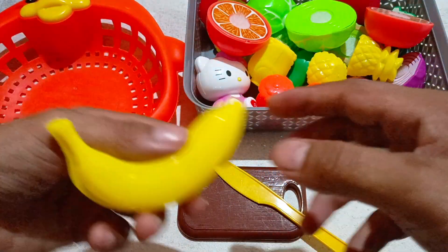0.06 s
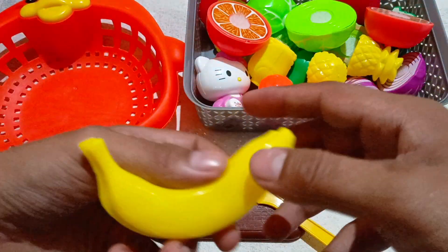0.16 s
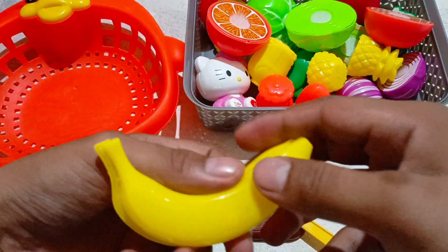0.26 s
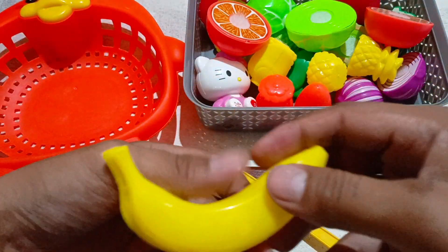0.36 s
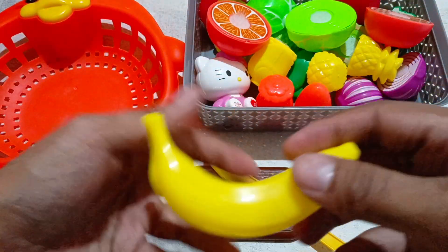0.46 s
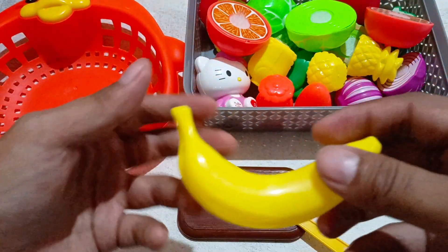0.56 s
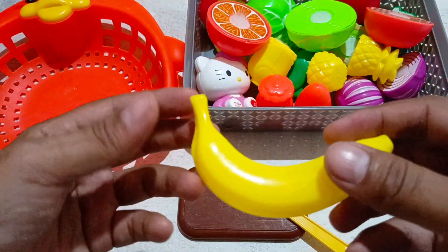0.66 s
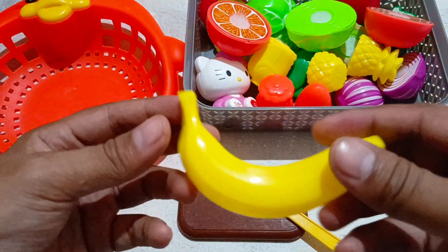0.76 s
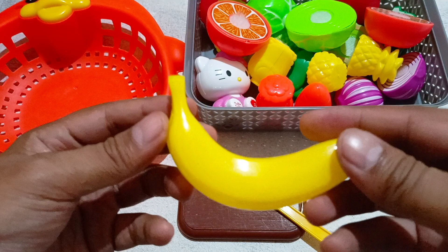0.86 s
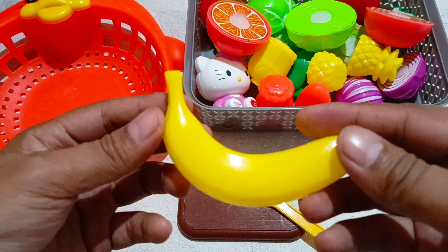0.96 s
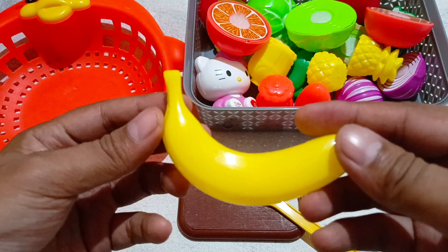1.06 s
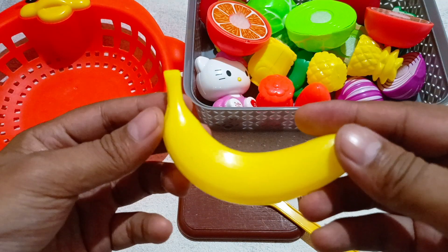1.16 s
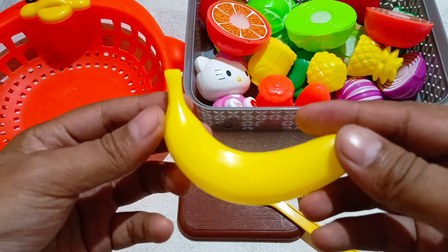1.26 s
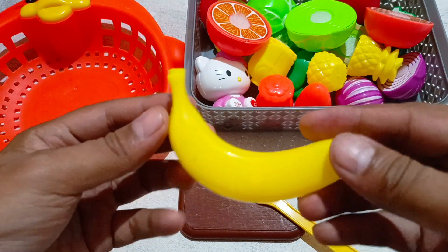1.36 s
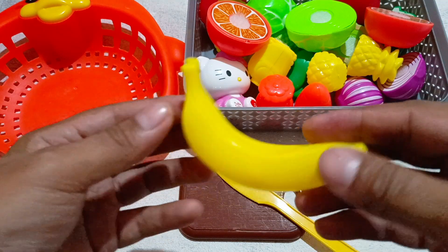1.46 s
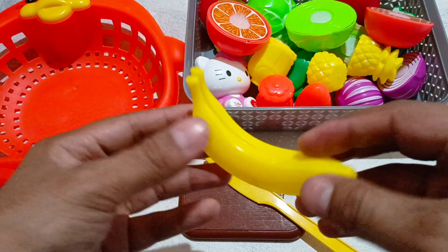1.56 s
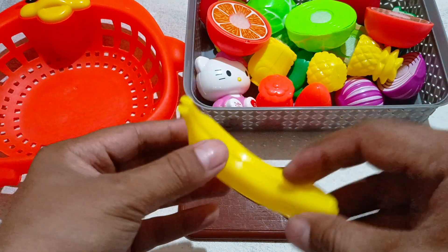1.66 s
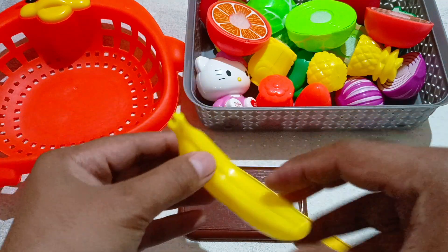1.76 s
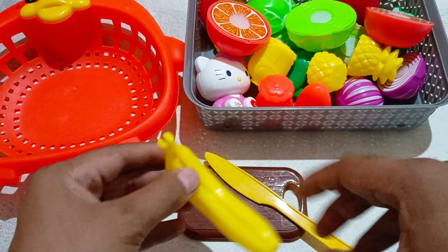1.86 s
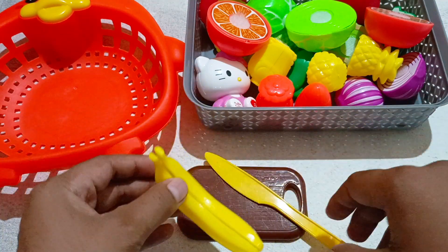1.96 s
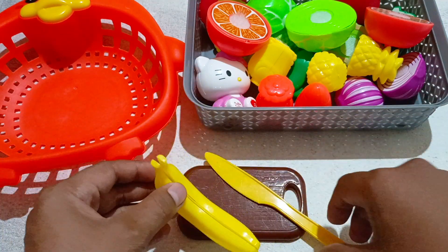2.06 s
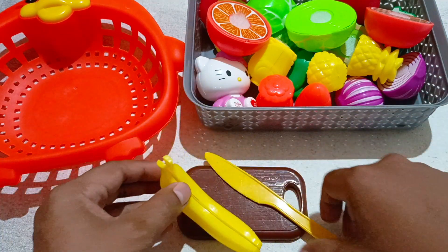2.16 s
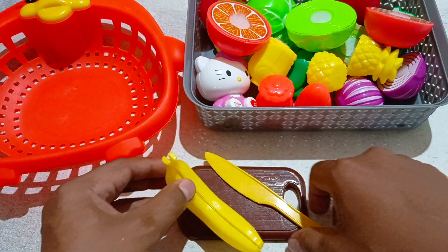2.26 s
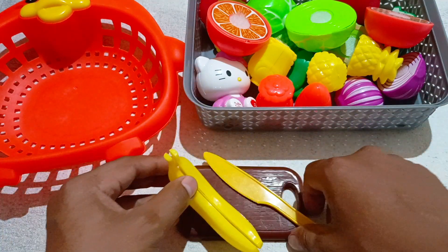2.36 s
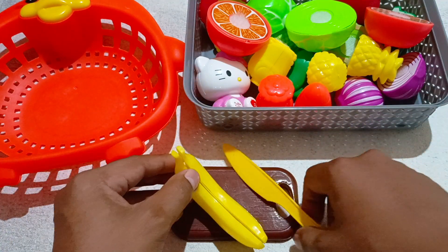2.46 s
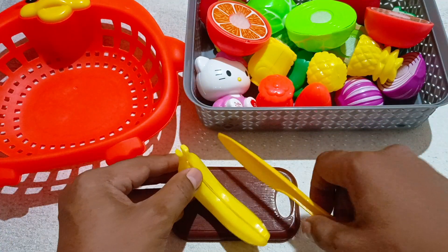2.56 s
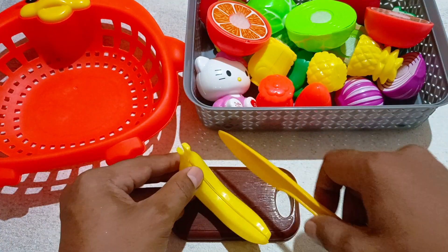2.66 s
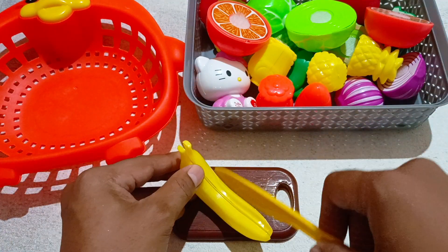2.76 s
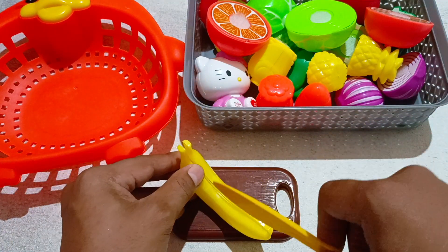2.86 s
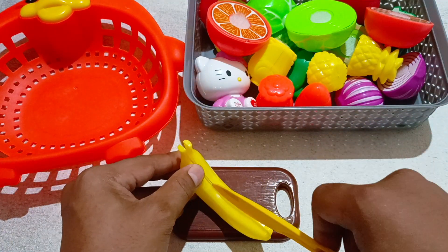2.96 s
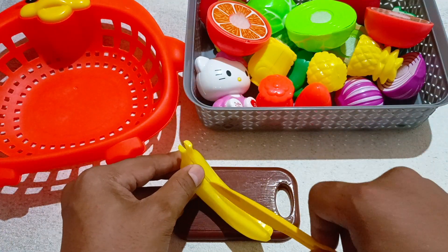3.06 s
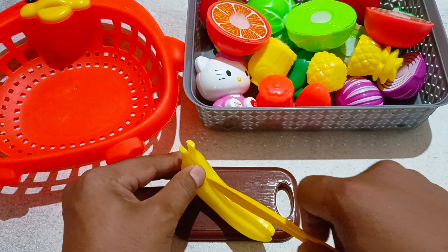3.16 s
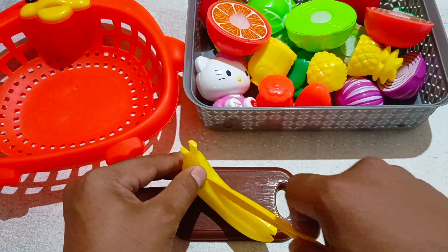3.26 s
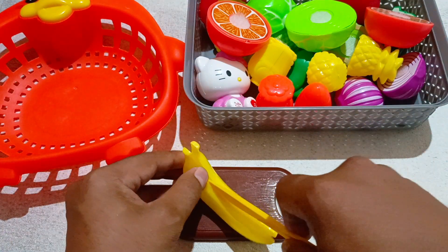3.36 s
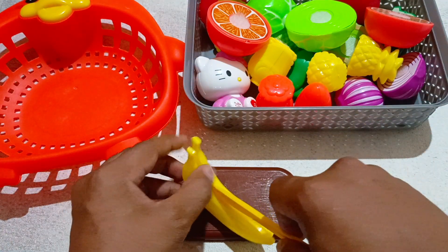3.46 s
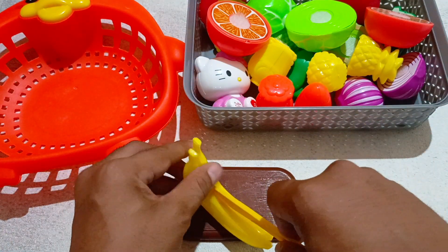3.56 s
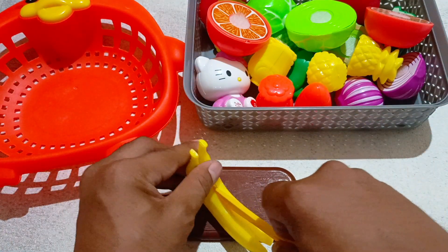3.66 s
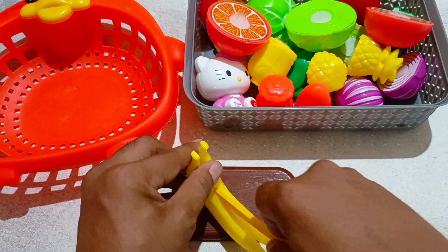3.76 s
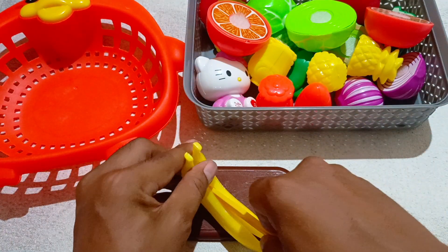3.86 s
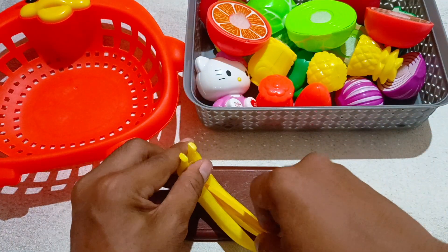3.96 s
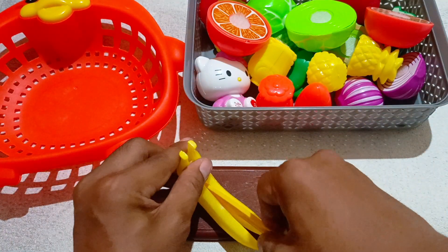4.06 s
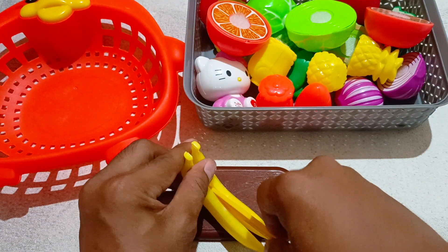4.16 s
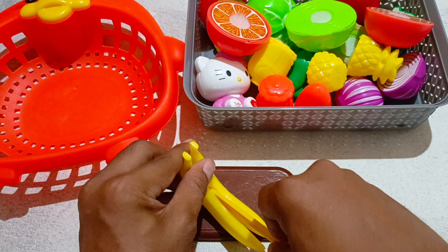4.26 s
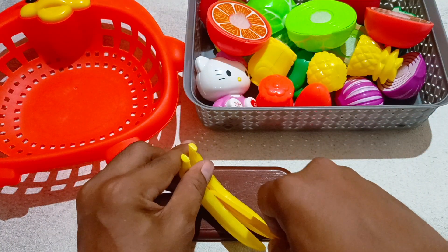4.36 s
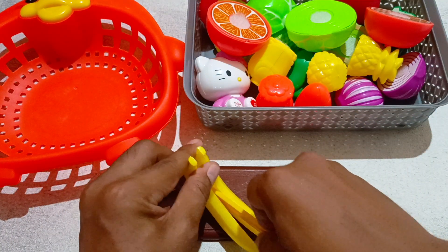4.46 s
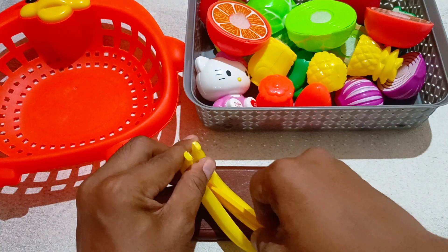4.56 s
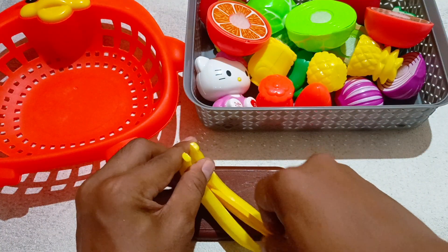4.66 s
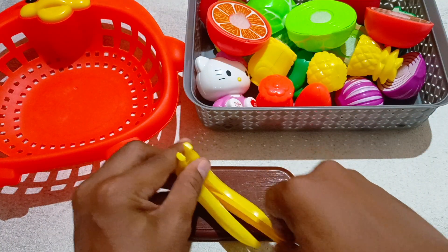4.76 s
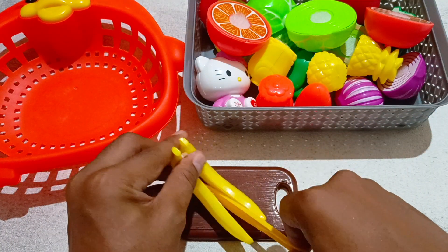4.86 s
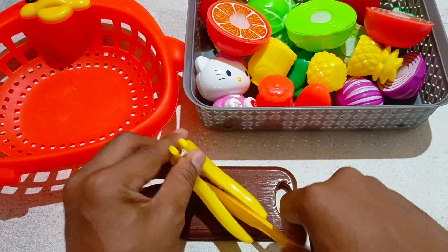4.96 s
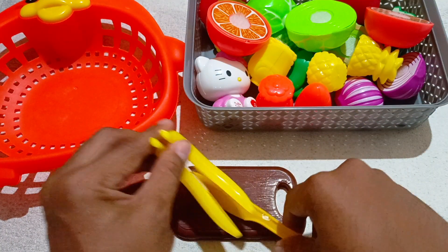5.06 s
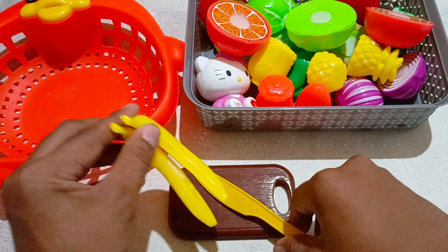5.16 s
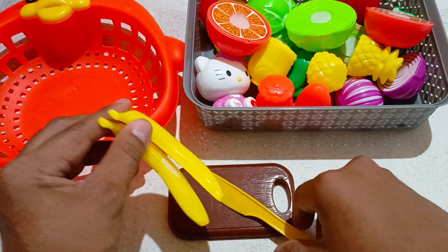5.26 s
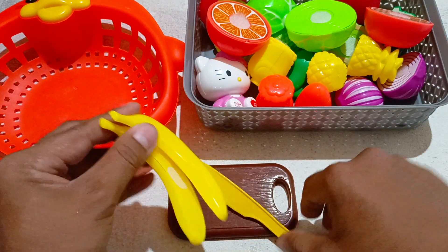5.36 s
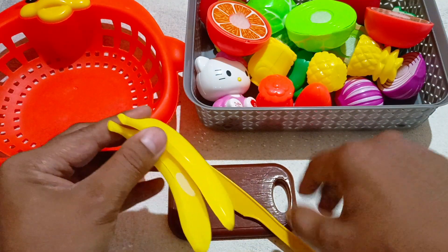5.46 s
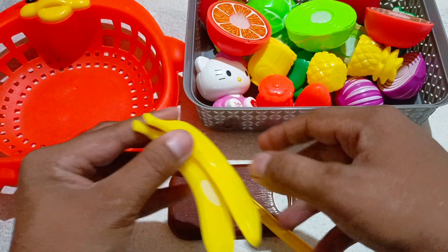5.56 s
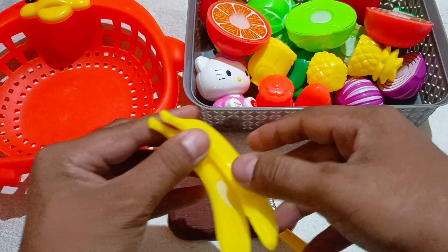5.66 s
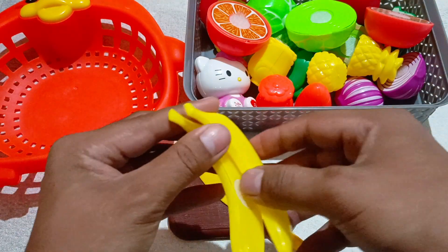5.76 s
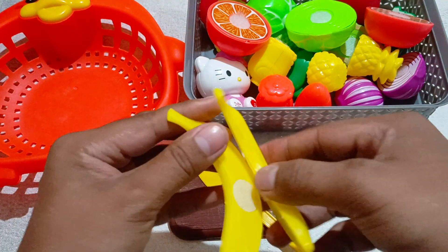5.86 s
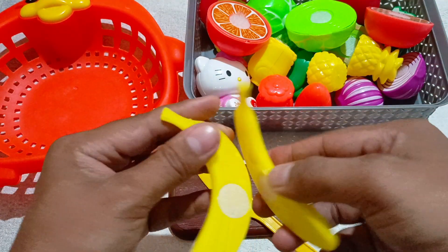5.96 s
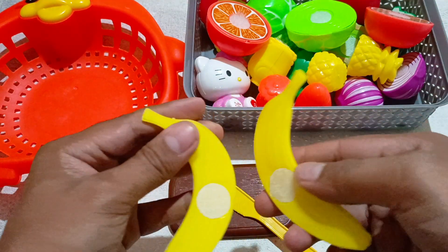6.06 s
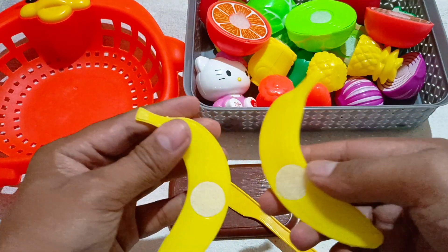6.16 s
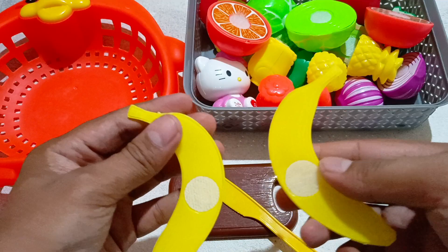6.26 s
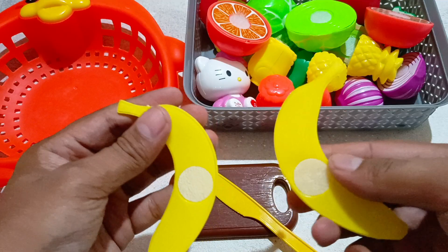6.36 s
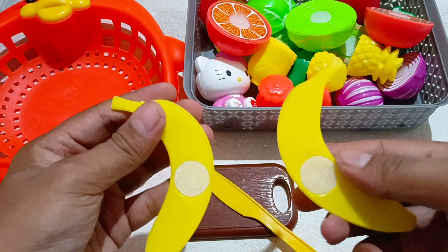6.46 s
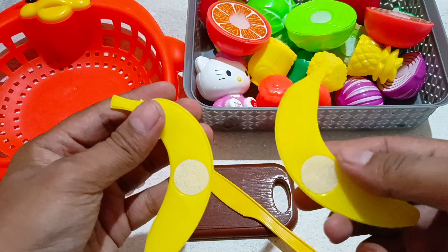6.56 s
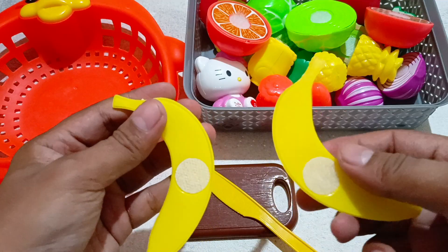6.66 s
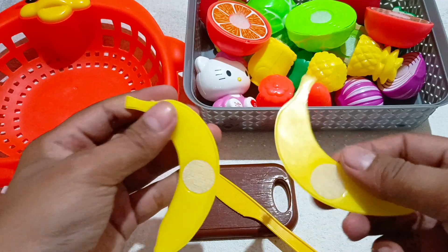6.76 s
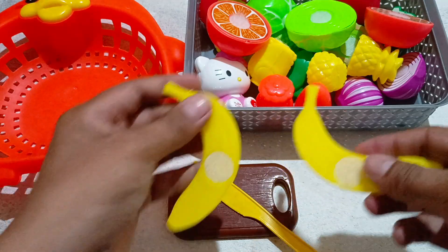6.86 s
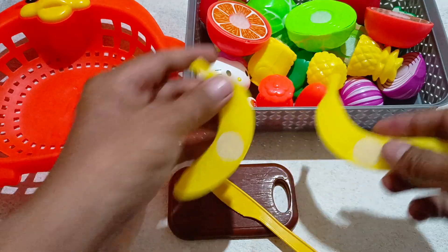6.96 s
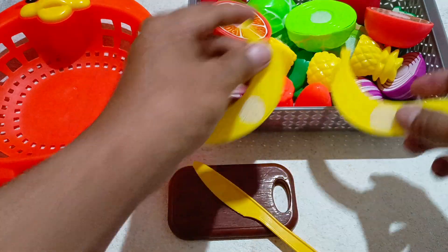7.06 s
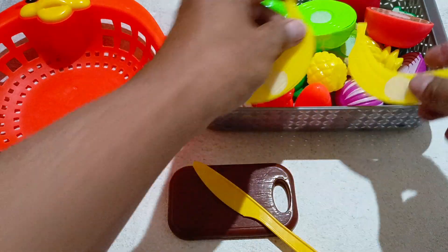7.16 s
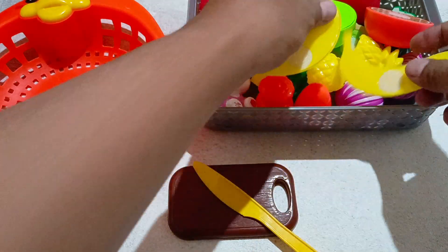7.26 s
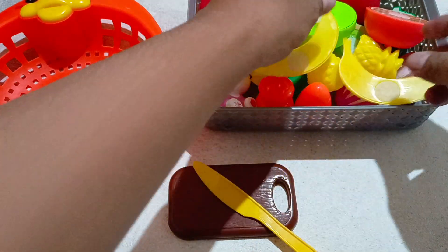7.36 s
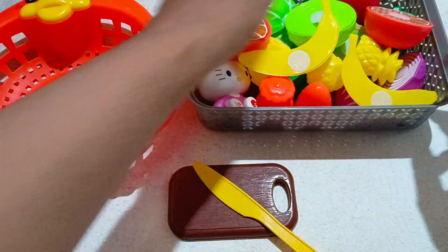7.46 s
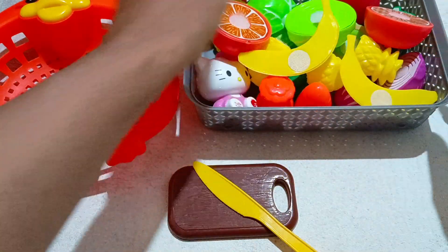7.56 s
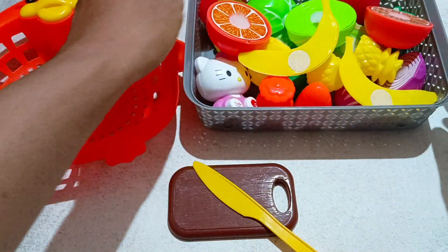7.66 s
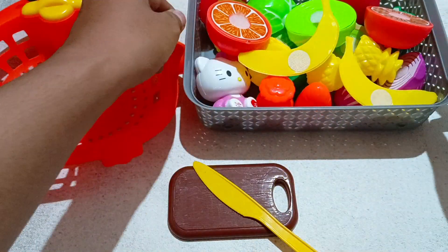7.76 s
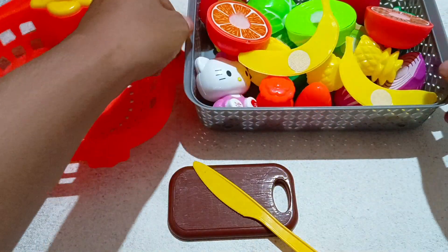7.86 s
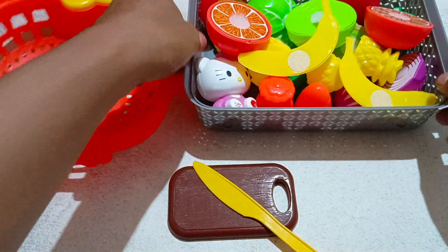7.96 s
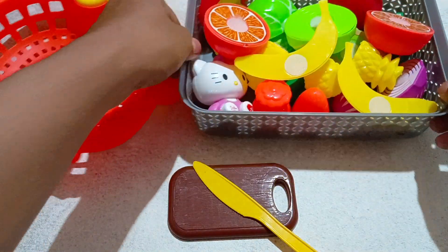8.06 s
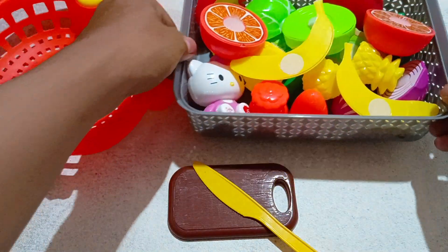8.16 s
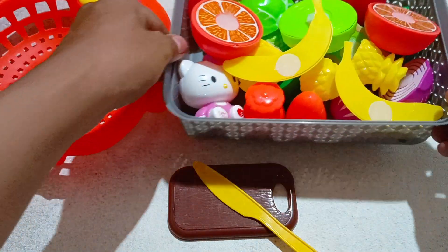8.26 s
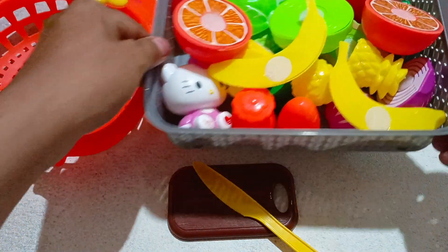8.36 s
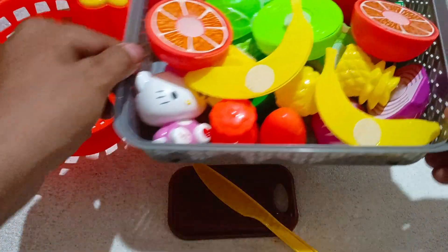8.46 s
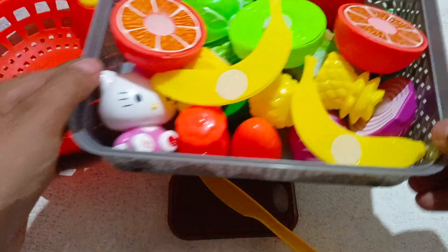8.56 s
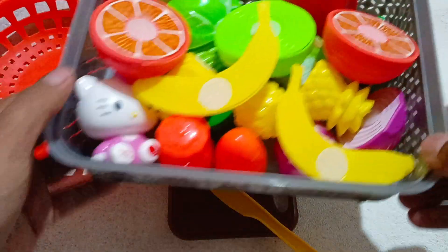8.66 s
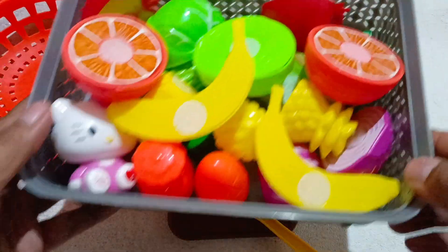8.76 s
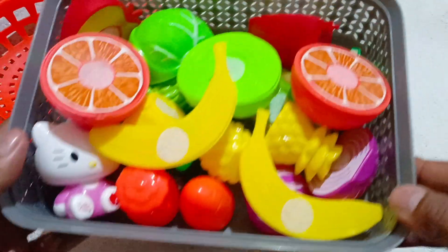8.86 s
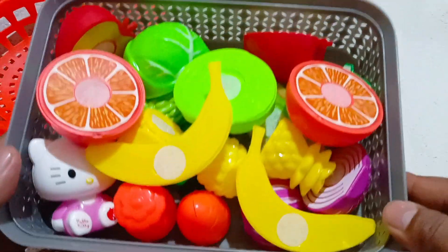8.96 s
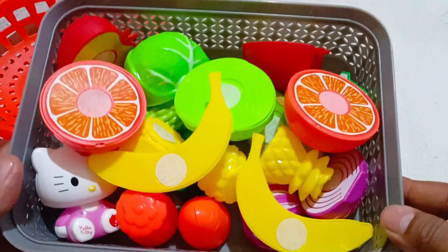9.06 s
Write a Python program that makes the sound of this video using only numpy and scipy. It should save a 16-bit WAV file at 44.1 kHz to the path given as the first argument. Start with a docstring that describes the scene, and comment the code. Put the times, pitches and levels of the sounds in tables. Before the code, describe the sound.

A toy knife tears apart a hollow plastic banana's hook-and-loop pad in crackling snaps, then the halves clatter into a basket in a small room.

```python
"""Hollow plastic toy food handled close to the microphone in a small, hard room.
A toy knife tears the hook-and-loop pad of a two-part banana: snaps and rasps ring its hollow shells.
The knife knocks and slides on the board, the freed halves clack and drop among pieces in a basket, and
the basket scrapes over the table and squeals faintly. Blows and rubs excite decaying modes with a crack.
A diffuse room tail follows the toys; room air, low rumble and wavering drones lie behind them."""
import sys
import numpy as np
from scipy import signal
from scipy.fft import rfft, irfft, next_fast_len
from scipy.io import wavfile

SR = 44100
rng = np.random.default_rng(int(sys.argv[2]) if len(sys.argv) > 2 else 0)


def dump(signal):
    """Clip the signal to [-1, 1] and save it as 16-bit WAV at the path in sys.argv[1]."""
    limited = np.clip(np.atleast_2d(signal).T, -1, 1)
    pcm = np.round(limited * 32767).astype(np.int16)
    wavfile.write(sys.argv[1], SR, pcm)


N = 401310
TIME = np.arange(N) / SR  # s
LEAD = 64  # samples kept ahead of an attack
BASS_PER_EDGE = .5  # a contact on an edge gains treble and loses this share of it in bass

# In contact tables the level is that of the middle band, before the trim of the source.
# In mode tables the level is relative, before a random scatter.

# Pushes of the knife through the pad.
# Each row: start in seconds, end in seconds, level of the ordinary snaps in dB, level of the rasp in dB.
STROKES = [(3.555, 3.613, -37, -49), (3.635, 3.925, -29, -45), (4.18, 4.295, -30.5, -40.5),
           (4.373, 4.485, -25, -34), (4.508, 4.618, -38, -49), (4.647, 4.775, -21, -37)]


def gain_of(db):
    """Decibels to an amplitude factor."""
    return 10 ** (np.asarray(db) / 20)


def evened(x):
    """Scales to rms 1."""
    return x / np.sqrt(np.mean(x ** 2) + 1e-20)


def read(points, hz):
    """Reads a table of (Hz, value) on a log-frequency axis."""
    f, value = np.transpose(points)
    return np.interp(np.log(hz + 1), np.log(f + 1), value)


def level(curve):
    """Turns a table of (s, dB) into a gain for every sample."""
    return gain_of(np.interp(TIME, *np.transpose(curve)))


def add(mix, s, sound):
    """Adds a sound whose attack lies LEAD samples in."""
    part = mix[max(round(s * SR) - LEAD, 0):][:len(sound)]
    part += sound[:len(part)]


def coloured(x, spectrum):
    """Filters causally to the given spectrum, with the least delay its levels allow (minimum phase)."""
    size = next_fast_len(len(x) + 2048)
    hz = abs(np.fft.fftfreq(size, 1 / SR))
    log_gain = np.log(gain_of(read(spectrum, hz)))
    response = np.exp(np.conj(signal.hilbert(log_gain)))
    return np.fft.ifft(np.fft.fft(x, size) * response).real[:len(x)]


def resonant_noise(peaks):
    """Steady noise through a few resonances, scaled to rms 1."""
    hz = np.fft.rfftfreq(N, 1 / SR)
    shape = sum(gain_of(db) / (1 + ((hz - f) / width) ** 2) for f, width, db in peaks)
    return evened(np.fft.irfft(rfft(rng.standard_normal(N)) * shape, N))


def ring(modes, crack_db, crack_t60, scatter_db=2, detune=0.012, contact_s=0.0002):
    """One impulse on a hollow piece: a crack and its modes, in a mix that varies at random with the spot."""
    # The dense, quickly dying crack of every contact, with the microphone's colour in it.
    # Each row: frequency in Hz, relative level in dB.
    crack_spectrum = [(30, -51), (120, -20.5), (250, -6.5), (500, -12), (680, -1.5), (1400, -1), (2000, 3),
                      (2900, 0), (3700, -7.5), (6500, -19.5), (8000, -14.5), (9500, -7.5), (11200, -20.5),
                      (15500, -23)]
    t = np.arange(SR // 6) / SR
    hz, db, t60 = np.transpose(modes)[:, :, None]
    size, shift, sign = rng.standard_normal((3, len(modes), 1))
    decay = gain_of(db + scatter_db * size - 60 * t / t60)
    tones = np.sign(sign) * decay * np.sin(2 * np.pi * hz * (1 + detune * shift) * t)
    burst = rng.standard_normal(len(t)) * gain_of(-60 * t / crack_t60)
    crack = coloured(burst, crack_spectrum)
    # the force builds up over the contact time, so the ring has no thump under it
    return tones.sum(0) * (1 - np.exp(-t / contact_s)) + gain_of(crack_db) * crack


def voiced(sound, length, db, bass_db, treble_db):
    """Sets a contact's strength over its first moments: firm support adds bass, a hard edge adds treble."""
    size = next_fast_len(len(sound) + 2 * LEAD)
    hz = np.fft.rfftfreq(size, 1 / SR)
    delayed = rfft(sound, size) * np.exp(-2j * np.pi * hz * LEAD / SR)
    bass = np.interp(hz, [1250, 1750], [1, 0])
    treble = np.interp(hz, [4000, 6000], [0, 1])
    bands = irfft(delayed * np.array([bass, 1 - bass - treble, treble]), size)
    opening = bands[:, LEAD:LEAD + round(length * SR)]  # length in seconds
    strength = np.sqrt(np.mean(opening ** 2, 1) + 1e-20)
    return (gain_of(db + np.array([bass_db, 0, treble_db])) / strength) @ bands


def edged(rows, colour):
    """Turns the last column, how edge-on a contact is, into bass and treble against the middle."""
    bass_db, treble_db = colour
    return [(*row, bass_db - BASS_PER_EDGE * edge_db, treble_db + edge_db) for *row, edge_db in rows]


def blows(rows, modes, trim_db, crack_db, crack_t60, rebound):
    """Each blow is a first contact and two weaker rebounds within a few milliseconds."""
    out = np.zeros(N)
    for s, *strength in rows:
        body = ring(modes, crack_db, crack_t60)
        sound = body.copy()
        for delay_s in rng.uniform(.0006, .0035, 2):
            sound += rebound * np.pad(body, (round(delay_s * SR), 0))[:len(body)]
        add(out, s, voiced(sound, .008, *strength))
    return gain_of(trim_db) * out


def rubs(rows, modes, trim_db, slips_per_s, spread_db, crack_db):
    """Friction: a swell of tiny slips at random moments, ringing the piece at four spots."""
    out = np.zeros(N)
    for start, end, *strength in rows:
        n = max(round((end - start) * SR), LEAD)
        sound = 0
        for spot in range(4):
            happens = rng.random(n) < slips_per_s / SR
            slips = happens * gain_of(spread_db * np.minimum(rng.exponential(1, n), 3))
            slips = slips * rng.choice([-1, 1], n) * signal.windows.cosine(n)
            sound = sound + signal.fftconvolve(slips, ring(modes, crack_db, 0.018))
        add(out, start, voiced(sound, n / SR, *strength))
    return gain_of(trim_db) * out


def drones(waver_hz=1.3, flutter=0.61):
    """Low tones that fade in and out, unsteady in pitch and level."""
    # Each row: start in seconds, end in seconds, centre frequency in Hz, rms level in dB before the flutter.
    drone_rows = [(-.2, 0.5, 200, -51.5), (0.399, 1.22, 198, -60.5), (2.3, 3.24, 94.3, -50.5),
                  (2.8, 12, 452.2, -64), (7.45, 8.3, 141.7, -51.5), (8.45, 9, 146, -54)]
    out = np.zeros(N)
    knots = np.linspace(0, TIME[-1], num=90)
    for start, end, hz, db in drone_rows:
        drift, swell = (np.interp(TIME, knots, rng.standard_normal(len(knots))) for _ in range(2))
        fade = np.clip(np.minimum(TIME - start, end - TIME) / 0.2, 0, 1)
        phase = 2 * np.pi * np.cumsum(hz + waver_hz * drift) / SR
        out += gain_of(db) * fade * (1 + flutter * swell) * np.sqrt(2) * np.sin(phase)
    return out


def background(air_db=-56, rumble_db=-0.5):
    """Room air as coloured noise, rumble as resonant noise of changing level, and the drones."""
    # Spectrum of the room air. Each row: frequency in Hz, relative level in dB.
    air_spectrum = [(15, -52.5), (25, -28), (53, -20), (72, -10), (141, -5.5), (200, -6.5), (229, -16),
                    (451, -17), (489, -20.5), (754, -19.5), (863, -24), (2690, -31), (5730, -51.5),
                    (9570, -46.5), (16000, -63)]
    # Low rumble of the table and surroundings. Each row: time in seconds, level in dB before rumble_db.
    rumble_curve = [(0.0, -54), (2.23, -58), (2.84, -48), (3.35, -54), (4.89, -51.5), (4.94, -56),
                    (5.04, -42), (5.22, -59), (5.75, -44.5), (5.83, -56.5), (6.82, -53.5), (7.0, -67.5),
                    (7.83, -41), (8.39, -55), (9.1, -46)]
    # Resonances of the rumble. Each row: frequency in Hz, half-width in Hz, relative level in dB.
    rumble_peaks = [(57.5, 4.3, -7), (84.6, 5.3, 5.5), (152, 46, -13.5)]
    air = gain_of(air_db) * evened(coloured(rng.standard_normal(N), air_spectrum))
    rumble = gain_of(rumble_db) * level(rumble_curve) * resonant_noise(rumble_peaks)
    return air + rumble + drones()


def banana():
    """Fingers rub the shell and make the pad tick; tearing it hook by hook drums the hollow shells."""
    # What the banana's shells ring with, closed or torn.
    # Each row: frequency in Hz, level in dB, t60 in seconds.
    shell_modes = [(475, -20.5, 0.039), (650, -7.5, 0.027), (744, -7, 0.035), (1002, -9.5, 0.041),
                   (1255, -12.5, 0.046), (2080, 4, 0.026), (2278, 0, .022), (2640, 1.5, 0.0098),
                   (3000, -7.5, 0.026), (4163, -18, 0.023), (4785, -23, 0.022), (9100, -17.5, .012)]
    # Fingers shifting the closed banana make its pad tick. Each row: time in seconds, level in dB.
    tick_rows = [(0.271, -51), (0.378, -49), (0.571, -57), (0.661, -49), (1.352, -53), (1.724, -65)]
    # Fingers rubbing the shell. Each row: start in seconds, end in seconds, level in dB.
    finger_rows = [(0.315, 0.43, -61.5), (0.726, 0.874, -67), (1.388, 1.463, -68), (1.716, 1.764, -60.5),
                   (3.047, 3.223, -63.5), (3.424, 3.461, -46.5), (6.619, 6.8, -68), (6.775, 6.829, -53)]
    # colours are (bass dB, treble dB) against the middle
    tick_colour, finger_colour, rasp_colour = (-8, -18.5), (-8, -13.5), (-7.5, -8.5)
    ticks = [(*row, *tick_colour) for row in tick_rows]
    fingers = [(*row, *finger_colour) for row in finger_rows]
    rasps = [(start, end, db, *rasp_colour) for start, end, _, db in STROKES]
    friction = rubs(rasps + fingers, shell_modes, trim_db=-1.5, slips_per_s=150, spread_db=4.5, crack_db=8.0)
    snaps = blows(ticks + tearing(), shell_modes, trim_db=0.5, crack_db=2.5, crack_t60=0.023, rebound=0.44)
    return friction + snaps


def tearing():
    """Each push frees a run of hooks around the few loud ones; pressure on the board sets their bass."""
    # Single hooks that hold on and let go with a loud snap. Each row: time in seconds, level in dB.
    loud_snaps = [(3.24, -31), (3.473, -36), (3.486, -37), (3.619, -26.5), (3.641, -22.5), (3.675, -19),
                  (3.711, -19.5), (3.778, -24), (3.821, -20.5), (3.863, -23.5), (3.895, -25.5),
                  (3.931, -24.5), (4.071, -28), (4.107, -25.5), (4.165, -22.5), (4.186, -22), (4.236, -27),
                  (4.344, -32.5), (4.374, -21.5), (4.389, -23), (4.399, -23), (4.424, -20), (4.434, -20.5),
                  (4.458, -21), (4.476, -24.5), (4.504, -24), (4.564, -25.5), (4.578, -26.5), (4.668, -19),
                  (4.6824, -16), (4.7, -25.5), (4.7205, -19), (4.727, -17.5), (4.7365, -14), (4.75, -22)]
    # The board booms along when the banana is pressed onto it.
    # Each row: time in seconds, bass of the snaps in dB against the middle.
    press_curve = [(3.24, -9), (3.7, -12.5), (3.85, -11.5), (4.2, -16.5), (4.372, -14), (4.398, 0),
                   (4.46, -14.5), (4.67, -12), (4.745, -0.5)]
    gap_s, jitter, spread_db = .013, .35, 2.5  # rows of hooks let go one after another, unevenly
    ease_db = 8  # snaps are weaker at both ends of a push
    hold_s = .006  # no other hook lets go this near to a loud one
    # the stronger a snap, the more of it goes into the shell and the less into treble
    treble_db, treble_per_db, typical_db = -11, 0.16, -25.5
    hooks = list(loud_snaps)
    for start, end, db, _ in STROKES:
        chance = rng.standard_normal(size=(40, 2))
        for due, (late, strong) in zip(np.arange(start, end, gap_s), chance):
            s = due + gap_s * jitter * late
            if min(abs(s - loud) for loud, _ in loud_snaps) > hold_s:
                ease = ease_db * (2 * (due - start) / (end - start) - 1) ** 4
                hooks.append((s, db + spread_db * strong - ease))
    return [(s, db, np.interp(s, *np.transpose(press_curve)), treble_db - treble_per_db * (db - typical_db))
            for s, db in hooks]


def knife():
    """The knife is picked up, meets the board at the end of the cut and is laid down: knocks and slides."""
    # Knocks on the board. Each row: time in seconds, level in dB, edge in dB.
    knock_rows = [(2.333, -52, -5), (2.356, -48, -1), (2.381, -36.5, 9.5), (2.569, -52, -3),
                  (2.925, -49, -6), (4.839, -41, -8), (4.958, -30.5, -6.5), (4.984, -36, -5),
                  (5.028, -35, 4.5), (5.086, -46, 3), (5.175, -48.5, 9), (5.3275, -28, 4.5),
                  (5.3305, -38, -11), (5.544, -30.5, 4.5), (5.698, -46, -3)]
    # Slides on the board. Each row: start in seconds, end in seconds, level in dB, edge in dB.
    slide_rows = [(2.36, 2.47, -47, 5.5), (4.91, 5.1, -45, -1.5), (5.13, 5.21, -56.5, -3),
                  (5.54, 5.78, -65, -12)]
    # What the knife rings with. Each row: frequency in Hz, level in dB, t60 in seconds.
    knife_modes = [(677, -7.5, 0.032), (1031, -5.5, 0.054), (1237, -4, 0.042), (1537, -3.5, 0.06),
                   (1620, -4.5, 0.067), (1780, -5, 0.022), (2016, -5.5, .04), (2350, -12, 0.0315),
                   (2532, -4.5, 0.05), (3030, -7, 0.033), (9830, -13.5, 0.032)]
    # The thin blade sings when it slides. Each row: frequency in Hz, level in dB, t60 in seconds.
    blade_modes = [(7500, 2, 0.033), (9650, 6, 0.05), (12100, -19, .06)]
    knocks = blows(edged(knock_rows, (-0.29, -12.5)), knife_modes,
                   trim_db=-1, crack_db=4.5, crack_t60=0.038, rebound=0.19)
    slides = rubs(edged(slide_rows, (2.2, -6.5)), knife_modes + blade_modes,
                  trim_db=-3.0, slips_per_s=240, spread_db=0, crack_db=18)
    return knocks + slides


def halves():
    """The loose banana halves clack: short blows on open shells."""
    # Each row: time in seconds, level in dB, edge in dB.
    clack_rows = [(5.852, -40.5, -2), (5.888, -30, 4), (5.896, -26, 3), (5.921, -28.5, -0.5),
                  (6.794, -43, -2), (6.809, -45.5, -3), (8.15, -38, -13)]
    # What a half rings with. Each row: frequency in Hz, level in dB, t60 in seconds.
    half_modes = [(670, -10, 0.05), (1320, -12, 0.051), (1943, -7, 0.03), (2440, 10, 0.017),
                  (2840, 10, 0.018), (3140, -5.5, 0.024), (10150, -11, 0.014)]
    return blows(edged(clack_rows, (-11.5, -13.5)), half_modes,
                 trim_db=-1.0, crack_db=12.5, crack_t60=0.016, rebound=0.26)


def basket():
    """Pieces fall and shift in the basket, it scrapes over the table, and a faint hollow squeal swells."""
    # Pieces falling and shifting. Each row: time in seconds, level in dB, edge in dB.
    drop_rows = [(7.3225, -25, 8), (7.331, -20.5, 0.5), (7.3495, -16.5, 0.5), (7.366, -14.5, -2.5),
                 (7.3755, -22.5, 10.5), (7.393, -14.5, -2.5), (7.4055, -23.5, -18.5), (7.418, -24.5, -3.5),
                 (7.595, -29, 0.5), (8.699, -54.5, -4), (8.776, -47.5, -0.5)]
    # Scrapes over the table. Each row: start in seconds, end in seconds, level in dB, edge in dB.
    drag_rows = [(7.75, 7.87, -49.5, -0.5), (7.8, 8.02, -51, -2), (7.93, 8.25, -56.5, 5),
                 (8.45, 8.56, -62.5, -1.5), (8.74, 8.93, -59, 0)]
    # What the basket rings with. Each row: frequency in Hz, level in dB, t60 in seconds.
    basket_modes = [(653.5, -16, 0.073), (798, -13.5, 0.027), (993, -17, 0.034), (1440, -12, 0.018),
                    (1674, -11, 0.17), (1738, -5, 0.051), (1780, 4.5, 0.012), (1960, -2.5, .035),
                    (2258, -11, 0.06), (2840, -10, 0.041), (3370, -15.5, .03), (9560, -13.5, 0.0076)]
    # Resonances of the squeal. Each row: frequency in Hz, half-width in Hz, relative level in dB.
    squeal_peaks = [(560, 23, 5), (1030, 140, -13.5), (1400, 51, -11), (1826, 130, -18)]
    # Swell of the squeal. Each row: time in seconds, level in dB.
    squeal_curve = [(9.0, -60), (9.035, -47), (9.065, -44.5), (9.1, -45)]
    drops = blows(edged(drop_rows, (-10, -13)), basket_modes,
                  trim_db=0.5, crack_db=8.5, crack_t60=0.016, rebound=.2)
    drag = rubs(edged(drag_rows, (1.4, -5)), basket_modes,
                trim_db=-6, slips_per_s=270, spread_db=2.5, crack_db=19)
    squeal = level(squeal_curve) * (TIME > squeal_curve[0][0]) * resonant_noise(squeal_peaks)
    # a softer contact loses its highest treble
    softened = signal.sosfilt(signal.butter(4, 12200, fs=SR, output="sos"), drops + drag)
    return softened + squeal


def room(x, tail_db=-7.0, build_s=0.0013, delay_s=.009):
    """The diffuse field: sound sent in all directions loses its fine ripple, builds up and dies by band."""
    # Reverberation of the room. Each row: frequency in Hz, t60 in seconds.
    room_t60 = [(200, 0.97), (700, 0.5), (1800, 0.39), (3000, 0.4), (6000, 0.44), (10000, 0.3),
                (15000, .28)]
    hop = 128  # samples
    frames = dict(nperseg=896, noverlap=896 - hop)
    hz, _, z = signal.stft(x, SR, **frames)
    ripple_hz = 25 + 600 * (hz[:, None] / 10000) ** 2
    mixing = np.exp(-.5 * ((hz[:, None] - hz) / ripple_hz) ** 2)
    power = mixing / mixing.sum(1, keepdims=True) @ abs(z) ** 2
    t = np.arange(1, SR * 3 // 4, step=hop) / SR
    decay = (1 - np.exp(-t / build_s)) * gain_of(-60 * t / read(room_t60, hz)[:, None]) ** 2
    stored = signal.fftconvolve(power, decay / decay.sum(1, keepdims=True), axes=1)
    stored = abs(stored)[:, :z.shape[1]]
    # noise takes on the stored power, band by band
    field = signal.stft(rng.standard_normal(N), SR, **frames)[2]
    tail = signal.istft(field * np.sqrt(stored / np.mean(abs(field) ** 2)), SR, **frames)[1]
    return x + gain_of(tail_db) * np.pad(tail, (round(delay_s * SR), 0))[:N]


def scene(lowest_hz=150):
    """All the toys in the room, over its background; small shells radiate little bass."""
    toys = banana() + knife() + halves() + basket()
    toys = signal.sosfilt(signal.butter(2, lowest_hz, "high", fs=SR, output="sos"), toys)
    return (room(toys) + background())[None]


def record(dry, edge_hz=15900):
    """Rounds off the loudest peaks, then limits the band."""
    rounded = dry / (1 + (dry / .95) ** 6) ** (1 / 6)
    lowpass = signal.firwin(511, edge_hz, window=("kaiser", 9), fs=SR)
    return signal.oaconvolve(rounded, lowpass[None], "same")


dry = scene()
out = record(dry)
dump(out)
```